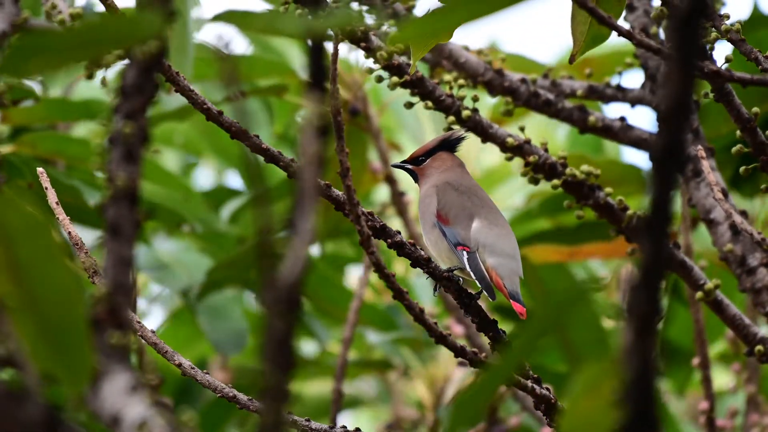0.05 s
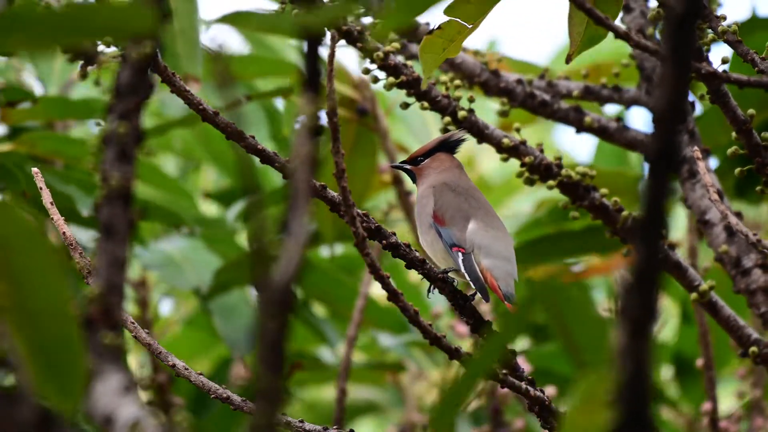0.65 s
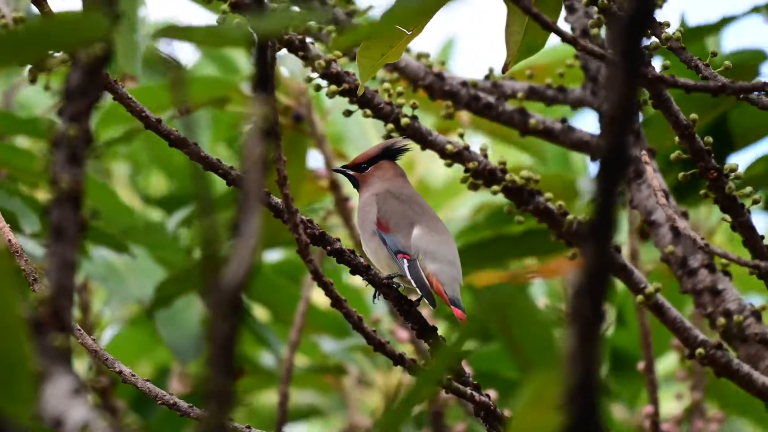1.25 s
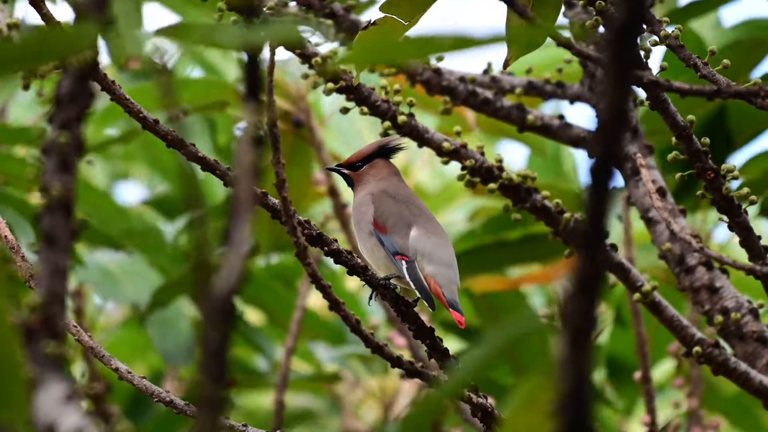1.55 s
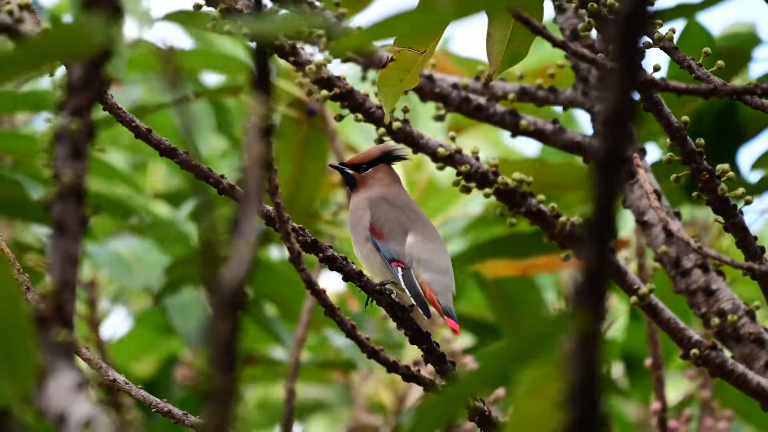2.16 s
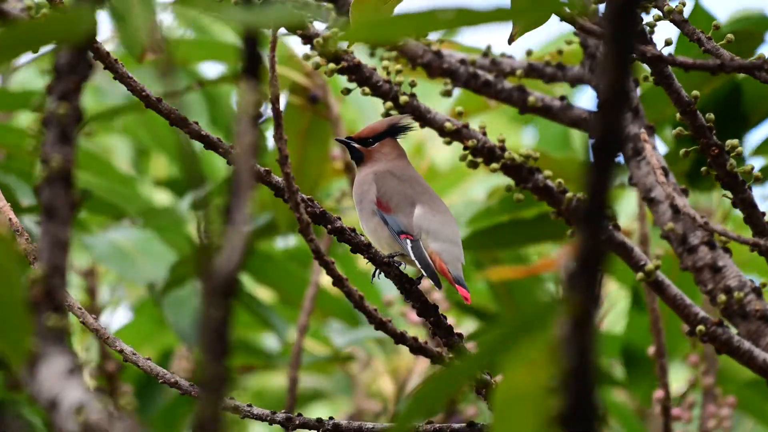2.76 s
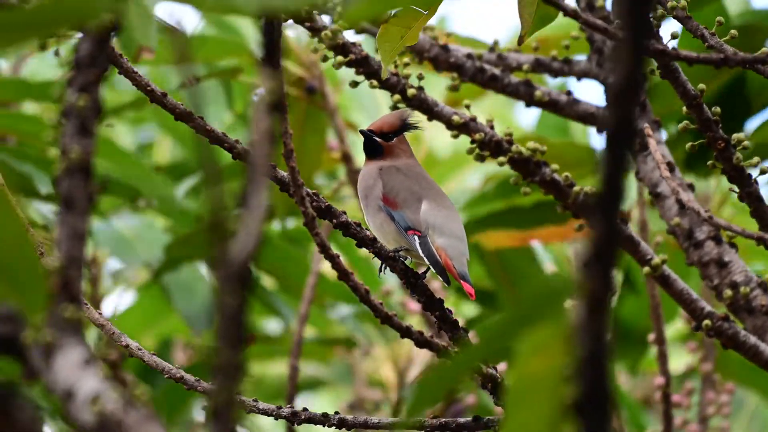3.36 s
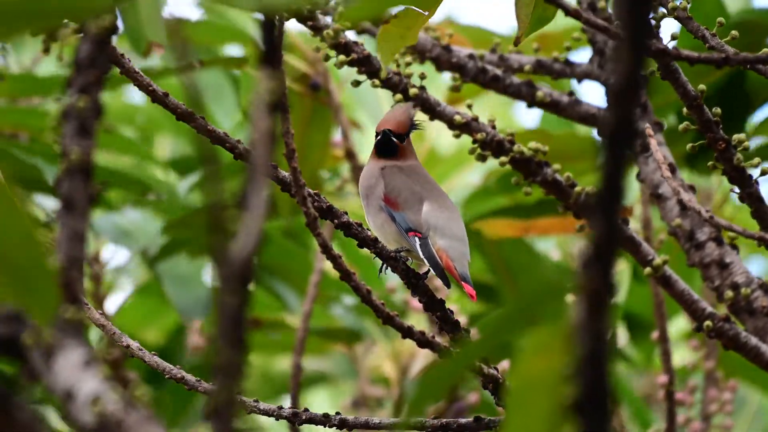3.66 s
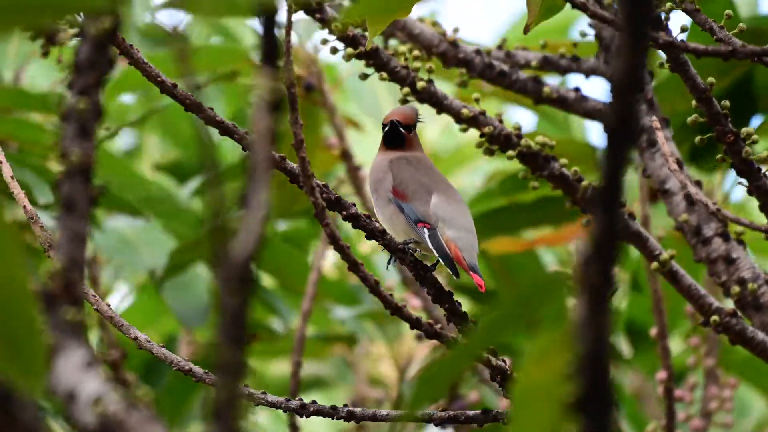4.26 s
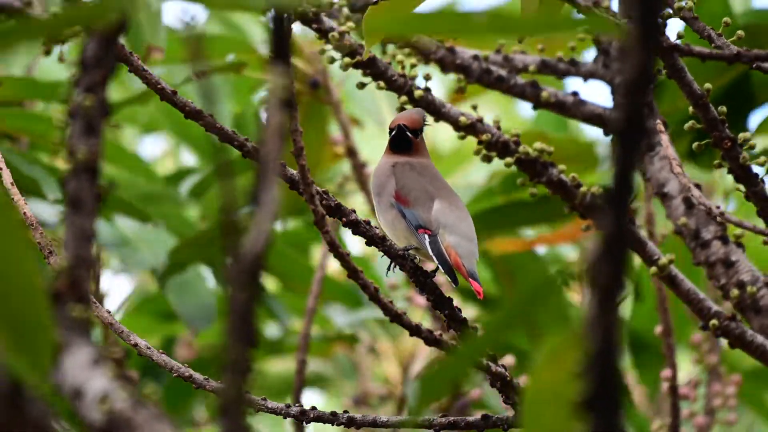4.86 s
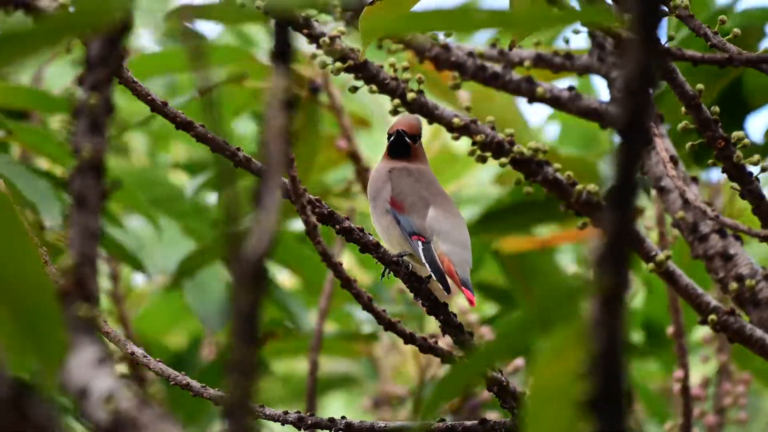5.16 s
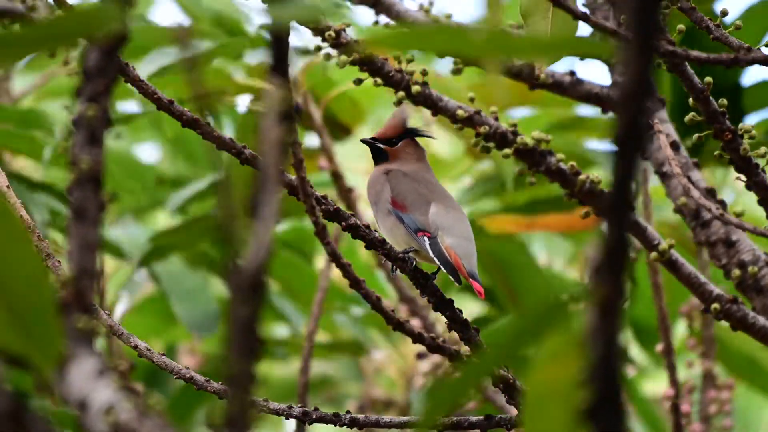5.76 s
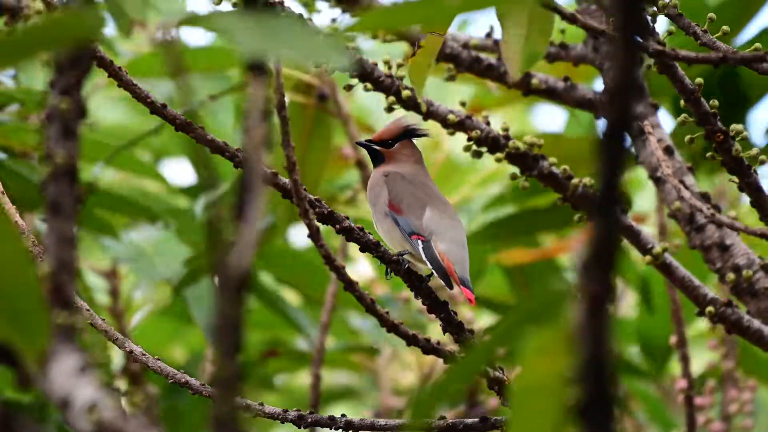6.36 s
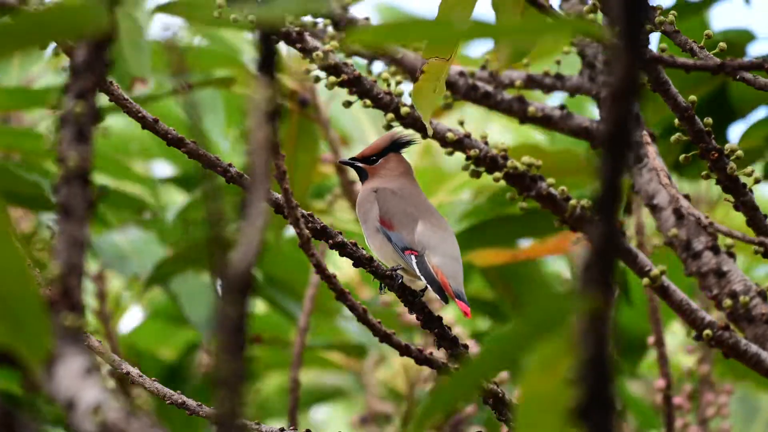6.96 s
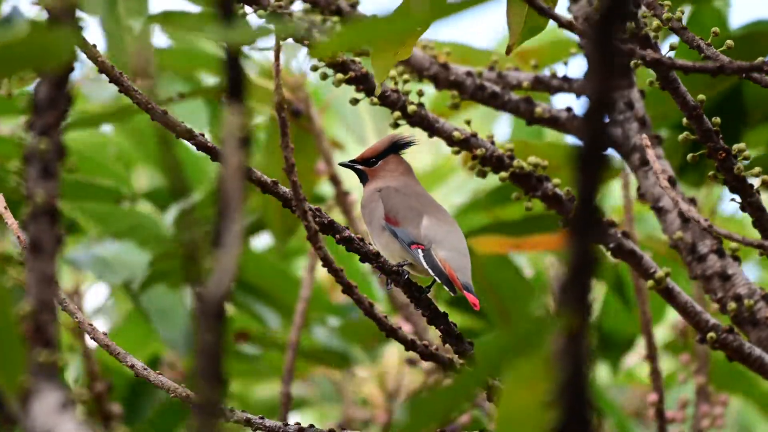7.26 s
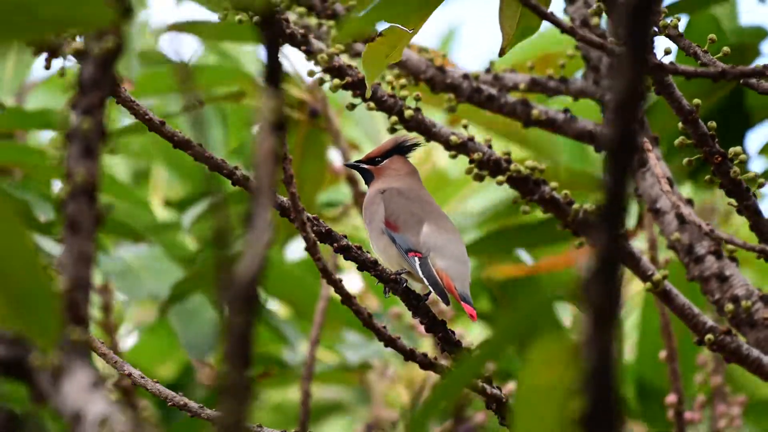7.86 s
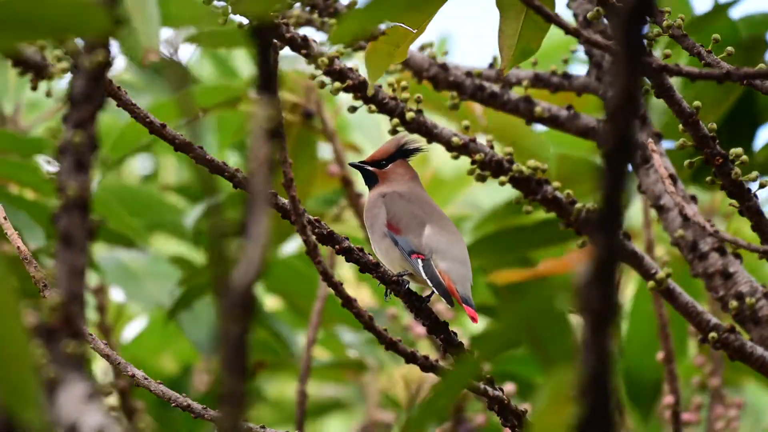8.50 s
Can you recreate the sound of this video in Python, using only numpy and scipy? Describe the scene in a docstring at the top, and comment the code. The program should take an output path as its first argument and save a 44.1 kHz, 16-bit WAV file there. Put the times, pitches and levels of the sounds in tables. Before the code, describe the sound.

High, raspy, upward bird chirps, then scattered whistles and hoarse chatter among trees, with soft air hiss and a few dull microphone bumps.

```python
"""In a leafy wood, a songbird gives seven sharp rising chirps, and one more later on.
Its voice box starts each chirp with a rasp, sweeps up and flicks down as it closes.
Other birds whistle arched notes and chatter hoarsely, and something calls far off;
trunks and leaves scatter every note. The hand-held camera rumbles and bumps,
twigs crackle, dry leaves rustle, and the air hisses softly."""
import sys
import numpy as np
from scipy import signal
from scipy.fft import rfft, irfft, next_fast_len
from scipy.io import wavfile

SR = 44100
rng = np.random.default_rng(int(sys.argv[2]) if len(sys.argv) > 2 else 0)


def dump_mix(stems):
    """Bounce the given channels to the path in sys.argv[1] as a 16-bit WAV at rate SR."""
    frames = np.atleast_2d(stems).T  # one column per channel
    limited = np.clip(frames, -1, 1)  # hard clip at full scale
    pcm = np.round(limited * 32767).astype(np.int16)
    wavfile.write(sys.argv[1], SR, pcm)


N = 380583
T = np.arange(N) / SR


def undb(db):
    """Turn decibels into a number to multiply by."""
    return 10 ** (np.asarray(db) / 20)


def unit(x):
    """Scale a sound so that its average strength (rms) is 1."""
    return x / np.sqrt(np.mean(x ** 2))


def curves(rows):
    """Join the dots of a table: one line through time for each column after the first."""
    times, *columns = np.transpose(rows)
    return [np.interp(T, times, column) for column in columns]


def add(out, start_s, x):
    """Mix x into out, beginning at start_s."""
    i = max(int(start_s * SR), 0)
    out[..., i:i + x.shape[-1]] += x[..., :N - i]


def walk(size, rate):
    """Wander by about 1 either way, heading for a new random value `rate` times a second."""
    place = np.arange(size) * rate / SR
    return 1.2 * np.interp(place, np.arange(8192), rng.standard_normal(8192))


def colour(x, points):
    """Shape bass and treble by points of (frequency [Hz], gain [dB]), fading steeply past the ends."""
    hz, db = np.transpose(points)
    size = next_fast_len(x.shape[-1])
    octave = np.log2(np.fft.rfftfreq(size, 1 / SR) + 1)
    outside = np.maximum(np.log2(hz[0]) - octave, 0) + np.maximum(octave - np.log2(hz[-1]), 0)
    gain = undb(np.interp(octave, np.log2(hz), db) - 41 * outside)
    return irfft(rfft(x, size) * gain, size)[..., :x.shape[-1]]


def sides(pan_db):
    """Gains for the two ears; the left is pan_db louder than the right."""
    return undb(np.array([[pan_db], [-pan_db]]) / 2)


def cycle(hz):
    """The angle (phase) a wave has turned through as it follows a changing pitch."""
    return 2 * np.pi * np.cumsum(hz) / SR


def arch(rise_s, fall_s, top_hz, up, down, roundness):
    """A pitch that climbs `up` octaves and sinks `down`, and the place along that arch, -1 to 1."""
    t = np.arange(int((rise_s + fall_s) * SR)) / SR
    place = np.interp(t, [0, rise_s, rise_s + fall_s], [-1, 0, 1])
    return top_hz * 2 ** (-np.where(place < 0, up, down) * np.abs(place) ** roundness), place


def wood(x, near_db, far_db, near_s, far_s, left_lag_ms=0):
    """Add a quick echo off leaves and a long one off trunks; they fade 60 dB in near_s and far_s."""
    t = np.arange(SR) / SR
    scatter, tail = rng.standard_normal((2, 2, SR))
    scatter = unit(scatter ** 3 * undb(-60 * t / near_s) * (t > .002))
    tail = unit(tail * undb(-60 * t / far_s) * (1 - np.exp(-t / .016)))
    echo = (undb(near_db) * scatter + undb(far_db) * tail) / np.sqrt(SR)
    # the sound that comes straight to each ear
    echo[0, int(max(left_lag_ms, 0) * SR / 1000)] += 1
    echo[1, int(max(-left_lag_ms, 0) * SR / 1000)] += 1
    echo /= np.sqrt(np.sum(echo ** 2) / 2)
    return signal.fftconvolve(x * np.ones((2, 1)), echo, axes=1)[:, :N]


# how loud the air is, before the gains below: (time [s], wash level [dB], hiss level [dB])
AIR_LEVELS = [(0.0, -66, -72), (0.89, -67, -73.5), (3.15, -65.5, -69.5), (4.42, -67.5, -71.5),
              (6.95, -65.5, -67.5), (8.63, -64, -67.5)]
# the tone of the soft wash: (frequency [Hz], gain [dB])
WASH_TONE = [(150, -28), (250, -13.5), (297, -15.5), (363, -2.5), (426, -4.5), (1370, -3), (1990, -3.5),
             (3050, 0.5), (3620, -7), (6000, -18), (7800, -36), (13200, -120)]
# the tone of the fine hiss: (frequency [Hz], gain [dB])
HISS_TONE = [(3500, -6.5), (5500, 3), (8000, -1), (11000, -4), (14500, -1.5), (16000, 0)]
# how alike the wash is in both ears: (frequency [Hz], likeness [0 to 1])
EAR_LIKENESS = [(200, 1), (600, 1), (1100, 0.85), (2000, 0.04), (8000, .18)]


def air(wash_gain_db=9, hiss_gain_db=4.5, lead_ms=.085):
    """Leaves and distance make a soft wash that reaches the left ear first, under a fine hiss."""
    wash_db, hiss_db = curves(AIR_LEVELS)
    hz, alike = np.transpose(EAR_LIKENESS)
    f = np.fft.rfftfreq(N, 1 / SR)
    alike = np.interp(f, hz, np.clip(alike, -.99, .99))
    shared, opposite = rfft(rng.standard_normal((2, N)))
    ear = np.array([[1], [-1]])
    lead = np.exp(1j * np.pi * f * ear * lead_ms / 1000)
    wide = irfft((shared * np.sqrt(1 + alike) + ear * opposite * np.sqrt(1 - alike)) * lead, N)
    wash = unit(colour(wide, WASH_TONE)) * undb(wash_db + wash_gain_db + walk(N, 14))
    hiss = unit(colour(rng.standard_normal((2, N)), HISS_TONE))
    hiss *= undb(hiss_db + hiss_gain_db + .5 * walk(N, 40))
    return wash * sides(.5) + hiss * sides(-1.7)


# the camera's constant rumble, before its gain: (time [s], level [dB])
RUMBLE_LEVELS = [(0.0, -58), (0.62, -53), (2.69, -56), (2.83, -48.5), (3.65, -62), (4.47, -48.5),
                 (5.05, -59), (5.38, -55.5), (5.79, -62), (7.09, -58.5), (8.15, -63.5), (8.63, -57.5)]
# the tone of that rumble: (frequency [Hz], gain [dB])
RUMBLE_TONE = [(12, -57), (20, -7), (54, 3), (97, 2.5), (173, -5), (220, -15), (290, -35.5), (480, -120)]
# the hand shifts its grip: (middle time [s], length [s], low level [dB], upper level [dB])
GRIP_SHIFTS = [(0.858, 0.081, -43.5, -44), (1.083, 0.032, -42, -57), (1.346, 0.032, -43, -52),
               (1.51, 0.17, -46.5, -53.5), (2.06, 0.081, -42, -54.5), (2.362, 0.12, -43.5, -53.5),
               (2.668, 0.075, -40.5, -53.5), (3.06, .15, -44, -56.5), (4.23, 0.081, -45.5, -47.5),
               (4.338, .06, -37.5, -50.5), (4.854, 0.065, -50, -54), (5.38, 0.16, -49.5, -66),
               (6.27, 0.16, -54.5, -73), (6.517, 0.042, -50, -74), (6.91, 0.43, -60, -66),
               (7.33, 0.14, -52, -69)]
# bumps on the camera body: (time [s], relative level [dB], pitch [Hz])
CAMERA_BUMPS = [(0.807, -33, 139), (.842, -31, 121), (.976, -32.5, 92), (1.547, -22.5, 161),
                (2.404, -27.5, 136), (2.615, -31, 144), (5.392, -33, 156), (7.311, -37.5, 123)]


def handling(low_gain_db=2, upper_db=-66, unrest_db=2, bump_gain_db=-3, fade_cycles=.94):
    """The camera rumbles more with each shift of the grip, and its body rings briefly when bumped."""
    low = undb(curves(RUMBLE_LEVELS)[0] + low_gain_db + unrest_db * walk(N, 12))
    upper = undb(upper_db + unrest_db * walk(N, 12))
    for middle, length, shift_low_db, shift_upper_db in GRIP_SHIFTS:
        swell = np.exp(-2 * ((T - middle) / length) ** 2)
        low = np.hypot(low, undb(shift_low_db) * swell)
        upper = np.hypot(upper, undb(shift_upper_db) * swell)
    upper_tone = [(180, 3.5), (230, .5), (330, -3.5), (480, -18.5)]
    out = low * unit(colour(rng.standard_normal(N), RUMBLE_TONE))
    out += upper * unit(colour(rng.standard_normal(N), upper_tone))
    for start, db, hz in CAMERA_BUMPS:
        turns = hz * np.arange(SR // 10) / SR
        shape = (1 - np.exp(-3 * turns)) * np.exp(-turns / fade_cycles)
        add(out, start - .003, undb(db + bump_gain_db) * 2 * np.sin(2 * np.pi * turns) * shape)
    return out


# spells of rustling: (time [s], length [s], level [dB])
LEAF_RUSTLES = [(3.524, 0.44, -65), (4.743, 0.53, -66), (5.8, .6, -66.5), (8.305, 0.52, -65)]


def leaves(ticks_per_s=160, tick_s=.0047):
    """Dry leaves brush each other in sprays of tiny ticks."""
    out = np.zeros((2, N))
    tone = [(2500, 16), (6000, 9), (10000, 3), (14000, 4), (16000, -17)]
    for start, length, db in LEAF_RUSTLES:
        size = int(length * SR)
        ticks = (rng.random(size) < ticks_per_s / SR) * rng.exponential(size=size)
        spray = signal.lfilter([1], [1, -np.exp(-1 / (tick_s * SR))], ticks)  # each tick dies away
        spray *= signal.windows.tukey(size, .4)  # fade in and out
        add(out, start, undb(db) * unit(colour(spray * rng.standard_normal((2, size)), tone)))
    return out


# the loudest snaps: (time [s], relative level [dB], relative treble [dB])
TWIG_SNAPS = [(.485, -44, 3), (1.606, -43, -20), (2.484, -44, -28), (3.876, -39.5, -17), (4.646, -37.5, -5),
              (4.679, -41.5, -24), (5.791, -40.5, -27), (5.815, -38, -15), (6.816, -37, -0.5),
              (7.041, -40, -24), (8.522, -40, -5)]
# the woody tone of a snap: (frequency [Hz], gain [dB])
TWIG_TONE = [(400, -48), (800, 6), (1100, 2), (1600, 6.5), (2400, -5), (3500, -19), (6000, -15)]


def twigs(gain_db=-10, snap_s=.0081, crumble_s=.035, crumble_db=-6, treble_db=-4, small_count=14):
    """Each twig snaps, then crumbles in a short spray of grains; small ones crackle at random."""
    out, t = np.zeros((2, N)), np.arange(SR // 8) / SR
    small = [(when * N / SR, -48 + 5 * force, -12) for when, force in rng.random((small_count, 2))]
    for start, db, bright_db in TWIG_SNAPS + small:
        grains = rng.standard_normal((2, len(t))) * undb(2 * walk(len(t), 587))
        grains = grains[0] + .34 * grains  # both ears share most of the snap
        body = unit(colour(grains, TWIG_TONE))
        edge = unit(colour(grains, [(3000, 14), (5500, -9), (9000, -17), (15000, -28)]))
        fade = np.exp(-t / snap_s) + undb(crumble_db) * np.exp(-t / crumble_s)
        add(out, start, undb(db + gain_db) * fade * (body + undb(bright_db + treble_db) * edge))
    return wood(out * sides(2.5), near_db=-4, far_db=-11, near_s=.041, far_s=.44)


def chorus(centre_hz=2950, db=-66, birds=4):
    """Birds twitter deep in the wood, blurred into its echo."""
    twitter = 0
    for _ in range(birds):
        hz = centre_hz * np.exp(.13 * walk(N, 60) + .05 * walk(N, 400))
        twitter = twitter + undb(12.7 * walk(N, 14)) * np.sin(cycle(hz))
    return undb(db) * unit(wood(twitter, near_db=23, far_db=-12, near_s=.089, far_s=.34))


# the course of the distant call: (time [s], pitch [Hz], relative level [dB])
CALL_PATH = [(5.48, 470, -68), (5.54, 503, -57), (5.60, 485, -54), (5.67, 447, -55), (5.77, 445, -57),
             (5.86, 430, -66)]
# the higher tones it is made of: (multiple of the pitch, gain [dB])
CALL_OVERTONES = [(2, -13), (3, 0), (4, -2), (5, -9)]


def far_call(gain_db=-1):
    """A far-off call lifts, then falls; it is all overtones, which makes it sound nasal."""
    hz, db = curves(CALL_PATH)
    phase = cycle(hz * (1 + .03 * walk(N, 400)))
    sounding = (T > CALL_PATH[0][0]) & (T < CALL_PATH[-1][0])
    voice = sum(undb(tone_db) * np.sin(k * phase) for k, tone_db in CALL_OVERTONES)
    return wood(undb(gain_db + db) * sounding * voice, near_db=3, far_db=-2, near_s=.2, far_s=.7)


# low sliding notes: (time [s], rise [s], fall [s], top pitch [Hz], drop [octaves], level [dB])
LOW_NOTES = [(2.488, 0.25, 0.11, 1538, 0.12, -57), (3.09, .19, .115, 1715, 0.51, -51),
             (3.469, 0.113, 0.036, 1645, .04, -63)]


def low_whistler(climb_octaves=.16, ends_db=-7, overtone_db=-11):
    """A bird whistles three slow arched notes, loudest at their tops."""
    out = np.zeros(N)
    for start, rise_s, fall_s, top_hz, drop, db in LOW_NOTES:
        hz, place = arch(rise_s, fall_s, top_hz, climb_octaves, drop, roundness=2.3)
        gain = undb(db + ends_db * place ** 2) * signal.windows.tukey(len(hz), .15)
        phase = cycle(hz * (1 + .004 * walk(len(hz), 110)))
        add(out, start, np.sqrt(2) * gain * (np.sin(phase) + undb(overtone_db) * np.sin(2 * phase)))
    return wood(out * sides(2), near_db=-7, far_db=-10, near_s=.12, far_s=.7, left_lag_ms=-.18)


# birds further in: (time [s], length [s], middle pitch [Hz], slide [octaves], level [dB])
HOARSE_CALLS = [(0.138, 0.089, 3400, .04, -55), (.312, 0.063, 3256, 0.16, -53),
                (0.541, 0.075, 3140, .23, -50), (.63, 0.11, 3156, -0.26, -50.5),
                (1.321, 0.17, 3160, -0.28, -48.5), (1.601, 0.088, 3200, -0.04, -51.5),
                (1.69, 0.17, 3237, -0.32, -46), (2.068, 0.094, 3130, -0.67, -50),
                (2.223, 0.17, 3106, 0.099, -47), (2.606, 0.068, 3190, -0.21, -57),
                (2.898, .06, 3080, -0.42, -49.5), (3.045, 0.038, 2560, 0, -49.5),
                (3.585, .1, 3150, -0.29, -55.5), (3.984, 0.14, 3325, 0.35, -56),
                (4.385, .09, 2870, .28, -55.5), (4.612, 0.055, 2810, 0.11, -50.5),
                (4.895, 0.068, 3260, .13, -57), (5.33, 0.18, 2970, -0.21, -51),
                (5.852, 0.091, 3065, 0.023, -49.5), (5.944, 0.18, 3150, 0.23, -48.5),
                (6.712, 0.038, 3145, 0.076, -49), (6.9, 0.065, 3400, 0.14, -52),
                (7.912, .18, 3100, 0.0055, -54.5), (8.252, 0.068, 3142, -0.34, -52)]


def chatter(warble=.09, rasp=.0404, faint_db=-60, faint_s=.06, faint_hz=2950, faint_count=34):
    """Short slides, hoarse because pitch and strength shake fast; fainter ones come at random."""
    out = np.zeros(N)
    faint = []
    for slot, (when, pitch, slide) in enumerate(rng.random((faint_count, 3))):
        start = (slot + when) * N / SR / faint_count
        faint.append((start, faint_s, faint_hz * 2 ** (.8 * (pitch - .5)), slide - .5, faint_db))
    for start, length, middle_hz, slide, db in HOARSE_CALLS + faint:
        size = int(length * SR)
        hz = middle_hz * 2 ** (slide * np.linspace(-.5, .5, size))
        hz *= 1 + warble * walk(size, 420) + rasp * walk(size, 1500)
        shape = signal.windows.tukey(size, .4) * undb(1.4 * walk(size, 151.7))
        add(out, start, undb(db) * unit(shape * np.sin(cycle(hz))))
    return wood(out, near_db=5, far_db=2, near_s=.045, far_s=.26)


# whistles of nearer birds: (time [s], rise [s], fall [s], top pitch [Hz], climb [octaves],
# drop [octaves], level [dB], swell from start to end [dB], left minus right [dB])
WHISTLES = [(2.81, .055, 0.012, 3380, .17, .01, -46, 0, 3),
            (2.876, 0.017, 0.027, 3400, .02, .05, -38.5, -4, 2),
            (3.165, 0.051, 0.086, 3257, 0.16, 0.031, -43.5, 2, 3),
            (4.161, 0.059, 0.067, 3382, .27, 0.28, -41, 11.5, 0),
            (5.135, .075, 0.065, 3495, .27, 0.084, -46, -1, 2.5),
            (5.504, 0.034, 0.071, 3327, 0.13, 0.29, -49, 0, 4.5),
            (6.018, 0.11, 0.029, 3733, 0.21, 0.079, -40, -7, -3.5),
            (6.318, 0.065, 0.013, 3447, 0.37, 0.025, -50.5, 5, -3),
            (6.451, .028, 0.093, 4350, 0.056, 0.8, -52.5, 9, -1),
            (6.624, .02, 0.064, 4040, 0.12, 0.81, -52.5, -4, -2),
            (7.044, 0.0478, 0.0078, 3120, 0.16, .01, -45.5, -8, -4),
            (7.098, 0.01, .048, 3166, 0.011, 0.23, -42.5, 6, -3),
            (7.67, .025, .028, 4100, 0.096, .04, -55, -4, -1),
            (7.72, 0.089, 0.049, 3454, 0.16, 0.085, -50, -8, 1.5),
            (7.843, 0.017, 0.016, 3930, .08, .06, -52, 3, -1),
            (8.558, 0.011, .055, 3940, 0.016, 0.18, -52.5, 2, 1)]


def whistlers(edge_s=.0042, close_level_db=-42.5, waver=.015, ends_db=-3, flutter_db=2):
    """Birds whistle nearly pure, fluttering arches; faint ones are further off, blurred by trees."""
    near, far = np.zeros((2, 2, N))
    for start, rise_s, fall_s, top_hz, climb, drop, db, swell_db, pan_db in WHISTLES:
        hz, place = arch(rise_s, fall_s, top_hz, climb, drop, roundness=1.8)
        distance = np.clip((close_level_db - db) / 10, 0, 1)  # 0 is near, 1 is far
        phase = cycle(hz * (1 + waver * (1 + distance) * walk(len(hz), 487.6)))
        fade = signal.windows.tukey(len(hz), 2 * edge_s / (rise_s + fall_s))
        tone = np.sin(phase) + undb(-34.5) * np.sin(2 * phase) + undb(-38.5) * np.sin(3 * phase)
        effort_db = swell_db * place / 2 + ends_db * place ** 2 + flutter_db * walk(len(hz), 108)
        note = np.sqrt(2) * tone * fade * undb(db + effort_db) * sides(pan_db)
        add(near, start, note * np.sqrt(1 - distance))
        add(far, start, note * np.sqrt(distance))
    return (wood(near, near_db=-.5, far_db=-9, near_s=.1, far_s=.6, left_lag_ms=.1)
            + wood(far, near_db=2.5, far_db=-1, near_s=.03, far_s=.36))


# the songbird's chirps; the knee is where the steep sweep turns into a slow climb:
# (time [s], time to the top [s], knee pitch [Hz], top pitch [Hz], level [dB], relative rasp [dB])
SONG_CHIRPS = [(.366, .125, 4814, 6050, -40, -5.5), (.726, 0.13, 4770, 5600, -41.5, -5),
               (1.049, 0.12, 4750, 5400, -43, -5), (1.348, 0.11, 4690, 5276, -43, -7),
               (1.646, 0.11, 4670, 5220, -43.5, -5.5), (1.943, .122, 4720, 5330, -42.5, -7.5),
               (2.246, .11, 4350, 5200, -43.5, -8), (5.200, .19, 4310, 4940, -46.5, -8.5)]
# extra tones in a chirp, where the halves make it harsh: (multiple of the pitch, gain [dB])
CHIRP_TONES = [(.5, -28), (1.5, -29), (2, -13), (2.5, -20), (3, -11)]


def songbird(fall_s=.06, knee_share=.28, hoarseness=.01, waver=.0045, flick_shake=.12,
             opening_db=5, flutter_db=1.6, burst_s=.0085, burst_db=.5, breath_db=-16):
    """The voice box (syrinx) opens with a rasp, sweeps up, climbs slowly and flicks down to close."""
    out = np.zeros((2, N))
    rasp_tone = [(2500, 4.5), (4500, 4), (7000, -.5), (9500, 1), (12000, -18), (16000, 3)]
    for start, top_s, knee_hz, top_hz, db, rasp_db in SONG_CHIRPS:
        knee_s, end_s = knee_share * top_s, top_s + fall_s
        size = int(end_s * SR)
        t = np.arange(size) / SR
        opening = np.exp(-(t / knee_s) ** 2)
        closing = np.sqrt(np.maximum(t - top_s, 0) / fall_s)
        hz = np.interp(t, [0, .82 * knee_s, knee_s, top_s - .008, top_s, end_s],
                       [.72 * knee_hz, .95 * knee_hz, knee_hz, top_hz, top_hz, .26 * top_hz])
        # fast jitter of the vibrating skin smears the overtones more than the whistle
        jitter = hoarseness * (1 + opening) * rng.standard_normal(size // 10 + 1).repeat(10)[:size]
        wobble = waver * (1 + 4 * opening) * walk(size, 698)
        shake = flick_shake * closing * walk(size, 500)
        hz *= 1 + jitter + wobble + shake
        phase = cycle(hz)
        effort_db = np.interp(t, [0, .68 * knee_s, knee_s, .8 * top_s, top_s, end_s],
                              [-12, -5, -4.5, .5, -4, -26])
        effort = undb(effort_db + flutter_db * walk(size, 138))
        whistle = np.sqrt(2) * effort * np.sin(phase)
        extras = sum(undb(tone_db + opening_db * opening) * np.sin(k * phase) * (k * hz < SR / 2)
                     for k, tone_db in CHIRP_TONES)
        rasp = unit(colour(rng.standard_normal(size), rasp_tone))
        burst = undb(burst_db) * t / burst_s * np.exp(1 - t / burst_s)
        breath = undb(breath_db) * np.sqrt(effort)
        treble = np.sqrt(2) * effort * extras + undb(rasp_db) * (burst + breath) * rasp
        # the bird sits to the right, and the left ear loses more of the treble than of the whistle
        add(out, start, undb(db) * (whistle * sides(-3) + treble * sides(-6)))
    return wood(out, near_db=1, far_db=-6, near_s=.18, far_s=.55, left_lag_ms=.055)


def scene():
    """All the birds, the wood and the camera, heard together."""
    voices = songbird() + whistlers() + chatter() + chorus() + low_whistler() + far_call()
    return voices + handling() + twigs() + leaves() + air()


def record(dry):
    """The camera steeply cuts the highest treble, above 15850 Hz."""
    return signal.sosfilt(signal.ellip(10, .2, 70, 15850, fs=SR, output="sos"), dry)


dry = scene()
out = record(dry)
dump_mix(out)
```